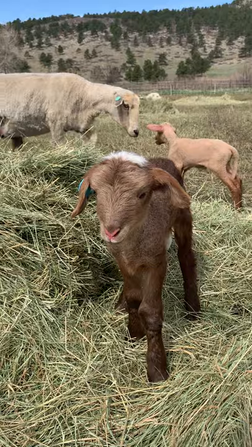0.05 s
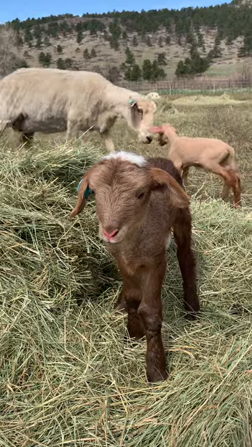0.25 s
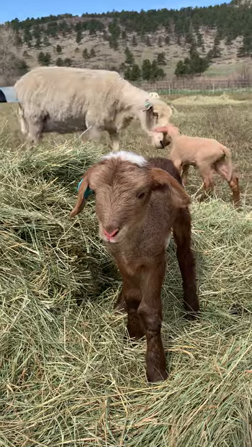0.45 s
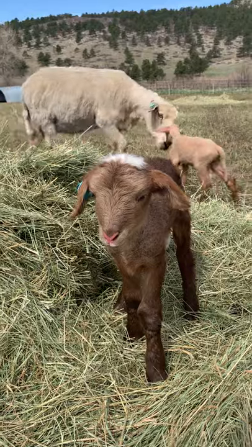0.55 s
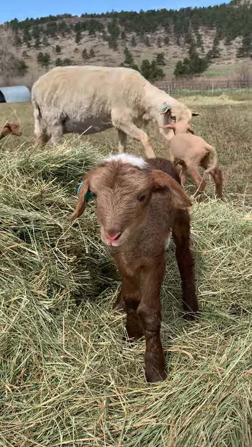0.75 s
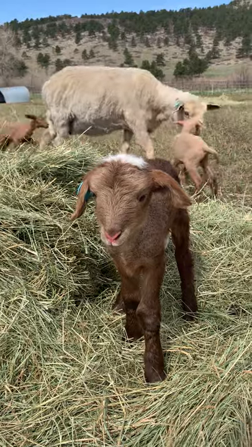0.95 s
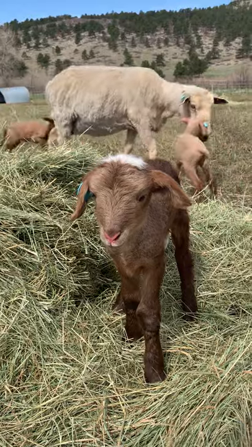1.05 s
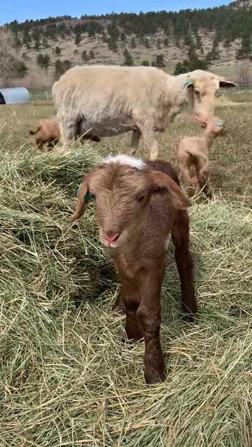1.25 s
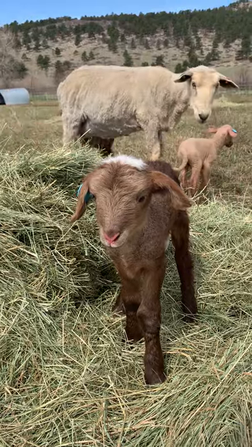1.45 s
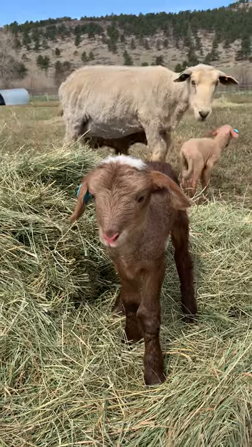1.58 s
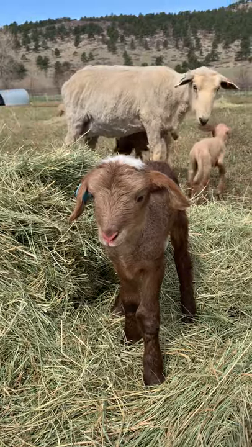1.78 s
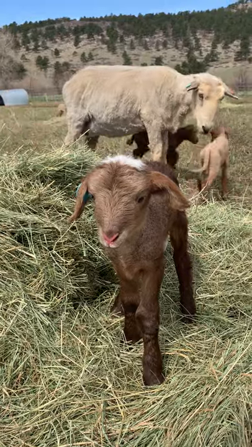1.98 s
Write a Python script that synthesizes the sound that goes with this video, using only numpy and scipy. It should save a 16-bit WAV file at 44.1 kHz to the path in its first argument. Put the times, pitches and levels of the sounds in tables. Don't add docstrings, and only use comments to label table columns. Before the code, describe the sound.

A lamb's high, stuttering bleat is already ending as it starts, fading within half a second; after a soft grunt, a ewe answers with a lower, buzzy bleat. Open pasture, low wind rumble, handheld stereo phone microphone.

```python
import sys
import numpy as np
from scipy import signal
from scipy.fft import rfft, irfft
from scipy.io import wavfile
from scipy.ndimage import uniform_filter1d

SR = 44100
rng = np.random.default_rng(int(sys.argv[2]) if len(sys.argv) > 2 else 0)


def gain_from_db(level_db):
    decades = np.asarray(level_db, float) / 20
    return 10 ** decades


def generate_wav(sig):
    pcm = np.round(np.clip(np.atleast_2d(sig).T, -1, 1) * 32767).astype(np.int16)
    wavfile.write(sys.argv[1], SR, pcm)


N = 89214
T = np.arange(N) / SR
HZ = np.fft.rfftfreq(N, 1 / SR)

# frequency_hz, density_db
AIR_SPECTRUM = [(300, 7), (600, 0.5), (1300, -1), (2200, -4.5), (3300, -22), (4500, -31), (7000, -31)]
# time_s, level_db
AIR_SWELL = [(0, -58.5), (.6, -62.5), (.9, -59.5), (1.4, -64), (1.75, -64)]
# frequency_hz, likeness_share
AIR_COHERENCE = [(350, 0.92), (600, 0.22), (1300, 0.56), (2200, 0.13), (5000, 0.18)]
# frequency_hz, phase_rad
AIR_PHASE = [(400, -10.5), (650, 0.4), (1800, -1.18), (2900, 0.5), (5000, -4.5)]
# frequency_hz, density_db
GRASS_SPECTRUM = [(3000, -1), (5500, -0.5), (7000, -6.5), (9500, 1.5), (12000, -6.5), (14000, -4),
                  (15500, -8)]
# time_s, level_db
GRASS_BREEZE = [(0, -76), (.36, -69), (.42, -73.5), (.5, -70), (.9, -74), (1.35, -78.5), (1.5, -71.5),
                (1.58, -73), (1.65, -79.5), (1.9, -79), (1.95, -71), (2.02, -75)]
# frequency_hz, likeness_share
GRASS_COHERENCE = [(4000, .6), (6000, .985), (15000, .99)]
# frequency_hz, density_db
WIND_SPECTRUM = [(12, -60), (20, -47), (43, -1.5), (75, 3), (117, -9), (155, 2.5), (184, -20.5),
                 (272, -19.5), (420, -28), (550, -98), (920, -120)]
# time_s, level_db
WIND_GUSTS = [(0.0, -39.5), (0.08, -40), (0.75, -38), (0.82, -34), (0.94, -41.5), (0.97, -35), (1.06, -42),
              (1.82, -39.5), (2.02, -48)]
# frequency_hz, width_hz, level_db
ENGINE_LINES = [(80.5, 7.7, -46), (153.6, 3.55, -44.5), (203.9, 40.6, -53), (271.3, 37, -62),
                (308.6, 4, -58.5)]
# time_s, level_db
ENGINE_DRIFT = [(0.0, -43), (0.17, -36.5), (0.22, -45.5), (0.46, -38.5), (0.76, -47), (0.96, -37),
                (1.33, -45.5), (1.6, -39.5), (1.85, -44), (1.91, -58), (1.94, -43.5), (2.02, -43.5)]

# centre_s, half_length_s, level_db, pitch_hz
LAMB_SYLLABLES = [
    (-.002, 0.02, -38, 343.4),
    (.068, 0.0108, -52.5, 330.5),
    (0.099, 0.0118, -58, 344.8),
    (0.129, 0.022, -42, 339.9),
    (0.202, .015, -46, 345.8),
    (0.266, 0.018, -44.5, 357.4),
    (0.339, 0.017, -46.5, 348.3),
    (0.422, 0.015, -51.5, 330.5),
    (0.45, 0.014, -65.5, 338.7),
]
LAMB_ROUGHNESS = [.35, .35, .5, .03, .14, .09, .14, .65, .75]
LAMB_DROOP = np.array([0.026, .03, 0.027, 0.009, .06, 0.055, .07, 0.027, 0.032])[:, None]
# time_s, level_db
LAMB_RASP = [(.05, -73.5), (.08, -59), (.17, -57.5), (.3, -55.5), (.365, -61.5), (.39, -67.5), (.47, -86)]
# frequency_hz, width_hz, level_db
LAMB_THROAT = [(1293, 200, -10), (1752, 165, -6.5), (2200, 310, -10), (3481, 255, 0), (4244, 310, -19),
               (4986, 226, -9), (5720, 150, -7.5), (6370, 310, -12)]
# frequency_hz, width_hz, level_db
LAMB_BREATH = [(8500, 1240, -23), (9670, 1900, -34)]
# frequency_hz, phase_rad
LAMB_PHASE = [(400, 0), (1300, -1.6), (2850, -3.14), (3600, -3.6), (4200, -6.2), (5000, -5)]
# frequency_hz, level_db
LAMB_SIDE = [(600, 9), (1300, 2), (1750, 23.5), (2300, -4), (3000, 2), (6000, 0)]

# time_s, level_db, pitch_hz
MOANS = [
    [(.12, -68, 315), (.145, -54, 316), (.175, -51, 310), (.197, -45, 262), (.21, -51, 240),
     (.225, -82, 229)],
    [(.16, -77, 445), (.18, -59, 437), (.2, -51.5, 387), (.222, -48, 290), (.24, -54.5, 275),
     (.27, -61, 271)],
]
# time_s, level_db, pitch_hz
GRUNT = [
    (.62, -71.5, 139.6),
    (.7, -56, 148.6),
    (.76, -61, 150.4),
    (.82, -61, 147),
    (.86, -59.5, 150.5),
    (.9, -74, 157),
]
# time_s, effort_db, pitch_hz, brightness_db
EWE_CALL = [
    (.865, -52, 145.9, -15),
    (.895, -49, 152.1, -16.5),
    (.94, -44, 157.1, -4),
    (1.008, -40, 168.1, -6),
    (1.1, -40.5, 161.1, -3),
    (1.205, -42.5, 160.8, -5.5),
    (1.24, -43.5, 139.9, -7.5),
    (1.285, -52.5, 132, -12),
    (1.34, -70, 128, -7),
]
# time_s, pitch_sag_share
EWE_CATCHES = [(.965, .035), (1.033, .06), (1.072, .06), (1.131, .05), (1.17, .07), (1.222, .03)]
# frequency_hz, width_hz, level_db
EWE_LOW = [(338, 150, -8), (564, 125, -1.5), (1068, 130, -9), (1540, 77, -2.5), (2030, 297, -5)]
# frequency_hz, width_hz, level_db
EWE_SHUT = [(473, 74, -2), (600, 86, -7), (1106, 160, -8.5), (1540, 43, -5.5), (2030, 173, -0.5)]
# frequency_hz, width_hz, level_db
EWE_HIGH = [(2960, 170, -19.5), (4310, 555, -13.5), (5680, 820, -17.5), (7220, 320, -1.5),
            (8160, 110, -5.5), (8190, 1610, -14.5), (10510, 280, -13), (13700, 4200, -32)]
# frequency_hz, phase_rad
EWE_PHASE = [(400, -0.34), (800, -1.08), (2300, -3.0), (3600, -1.5), (5000, -5)]
# frequency_hz, level_db
EWE_SIDE = [(500, -1), (1000, 2), (1800, 2), (2300, -4.5), (2900, 18), (4400, 1), (8000, 2.5)]
# time_s, level_db, frequency_hz, length_s
STRAW_TICKS = [
    (1.582, -76, 4500, .0004),
    (1.611, -77, 4400, .001),
    (1.639, -65, 4600, .0004),
    (1.797, -56, 11000, .00005),
    (1.849, -54, 11000, .00005),
    (1.881, -49, 12000, .00005),
    (1.916, -67, 4600, .0011),
]


def evened(x):
    return x / np.sqrt(np.mean(x ** 2) + 1e-20)


def read(points, hz):
    f, value = np.transpose(points)
    return np.interp(np.log(hz + 1), np.log(f + 1), value)


def curve(rows, order=1):
    return np.interp(T, np.array(rows)[:, 0], np.array(rows)[:, order])


def during(rows):
    return (T > rows[0][0]) * (T < rows[-1][0])


def sine(hz):
    return np.sin(2 * np.pi * np.cumsum(hz) / SR)


def port_turn(points, hz):
    lead_hz, port_gap_s = 6930, 1 / 4620
    f, rad = np.transpose([*points, (lead_hz, -np.pi)])
    lead = 2 * np.pi * port_gap_s * np.maximum(hz - lead_hz, 0)
    return np.exp(1j * (np.interp(hz, f, rad) + lead))


def throat(x, peaks):
    shape = 0
    for k, (hz, width, db) in enumerate(peaks):
        shape = shape + (-1) ** k * gain_from_db(db) / (1 + 1.3j * (HZ - hz) / width) ** 2
    return irfft(rfft(x) * shape, N)


def folds(hz, jitter):
    wander = evened(uniform_filter1d(rng.standard_normal(N), size=160))
    turns = np.cumsum(hz * (1 + jitter * wander)) / SR
    harmonics = int(15000 / hz.max())
    pulses = sum(np.cos(2 * np.pi * k * turns) for k in range(1, harmonics))
    puffs = (.12 + np.exp(-(turns % 1) / .18)) * rng.standard_normal(N)
    return evened(pulses), evened(puffs)


def placed(x, phase, side):
    z, tilt = rfft(x), gain_from_db(read(side, HZ) / 2)
    scatter_db, decay_s = -13, .09
    t = T[:8000]
    tail = rng.standard_normal((2, 8000)) * gain_from_db(-60 * t / decay_s) * (t > .002)
    band = (HZ > 420) / (1 + (HZ / 3000) ** 2)
    scatter = irfft(z * rfft(tail / np.linalg.norm(tail[0]), N) * band, N)
    direct = irfft([z * tilt, z / tilt * port_turn(phase, HZ)], N)
    return direct + gain_from_db(scatter_db) * scatter


def diffuse_hiss(colour, likeness, patchy_db, flicker_db):
    frames, hz = N // 128 + 5, np.fft.rfftfreq(512, 1 / SR)
    a, b, c, d, patches = rng.standard_normal((frames, 257, 5)).T
    flicker = evened(uniform_filter1d(uniform_filter1d(patches[0], size=9), size=9))
    patches = uniform_filter1d(uniform_filter1d(patches, size=12, axis=0), size=16, axis=1)
    patches = evened(patches)
    same = np.clip(read(likeness, hz), 0, 1)[:, None]
    left = a + 1j * b
    right = same * left + np.sqrt(1 - same ** 2) * (c + 1j * d)
    right = right * port_turn(AIR_PHASE, hz)[:, None]
    level = gain_from_db(read(colour, hz)[:, None] + patchy_db * patches + flicker_db * flicker)
    z = np.array([left, right]) * level * (hz > 300)[:, None]
    return evened(signal.istft(z, nperseg=512, noverlap=384)[1][:, :N])


def open_air():
    return gain_from_db(curve(AIR_SWELL)) * diffuse_hiss(AIR_SPECTRUM, AIR_COHERENCE, patchy_db=1.0, flicker_db=2.3)


def dry_grass():
    hiss = diffuse_hiss(GRASS_SPECTRUM, GRASS_COHERENCE, patchy_db=1.5, flicker_db=2.1)
    return gain_from_db(curve(GRASS_BREEZE)) * hiss


def wind():
    z = rfft(rng.standard_normal(N))
    shape = gain_from_db(read(WIND_SPECTRUM, HZ)) * (HZ > 15) / (1 + (HZ / 430) ** 8)
    return evened(irfft(z * shape, N)) * gain_from_db(curve(WIND_GUSTS) - 0.5)


def far_engine():
    z = rfft(rng.standard_normal(N))
    lines = 0
    for hz, width, db in ENGINE_LINES:
        lines = lines + gain_from_db(db) * evened(irfft(z / (1 + (2 * (HZ - hz) / width) ** 2), N))
    return lines * gain_from_db(curve(ENGINE_DRIFT) + 40.0)


def lamb():
    at, half, db, hz = (c[:, None] for c in np.transpose(LAMB_SYLLABLES))
    rough = np.reshape(LAMB_ROUGHNESS, (-1, 1))
    droop = np.reshape(LAMB_DROOP, (-1, 1))
    u = (T - at) / half
    bells = gain_from_db(db - 9 * u ** 4 / (1 + 0.045 * u ** 2)) + 1e-9
    share = bells ** 2 / (bells ** 2).sum(0)
    pitch = (share * hz * (1 - droop * np.minimum(u ** 2, 1.5))).sum(0)
    pulses, noise = folds(uniform_filter1d(pitch, size=200), jitter=.006)

    breath = throat(.25 * pulses + noise, LAMB_BREATH) * gain_from_db(2.5 - 18.5 * T)
    clean = evened(throat(pulses, LAMB_THROAT) + breath)
    puffs = evened(throat(noise, LAMB_THROAT) + breath)

    shifted = [(f * 0.983, width, level + 0.5 * max(f / 1000 - 3.5, 0)) for f, width, level in LAMB_THROAT]
    between = evened(throat(0.56 * pulses + 0.64 * noise, shifted) + breath)
    rasp = gain_from_db(curve(LAMB_RASP)) * (T < LAMB_RASP[-1][0])

    voice = (bells * np.sqrt(1 - rough)).sum(0) * clean
    voice = voice + (bells * np.sqrt(rough)).sum(0) * puffs + 1.83 * rasp * between
    return placed(voice, LAMB_PHASE, LAMB_SIDE) * (T < .8)


def moans():
    return sum(gain_from_db(curve(m)) * during(m) * np.sqrt(2) * sine(curve(m, order=2)) for m in MOANS)


def hoof_thump():
    start_s, width_s, level_db, pitch_hz = .2225, .0024, -47, 1500
    u = np.maximum(T - start_s, 0) / width_s
    envelope = np.minimum(u * 2, 1) * np.exp(-u / 7)
    return gain_from_db(level_db) * envelope * sine(pitch_hz * (.22 + .78 * np.exp(-u)))


def grunt():
    clean, puffs = folds(curve(GRUNT, order=2), jitter=.06)
    low = evened(throat(.25 * clean + .75 * puffs, EWE_LOW[:3]))
    return placed(low * gain_from_db(curve(GRUNT)) * during(GRUNT), EWE_PHASE, EWE_SIDE)


def ewe():
    catch_s, catch_db, rough, high_rough = .011, -32, .25, .36
    opens_s, opening_s = 0.97, .015
    sag = sum(share * np.exp(-((T - s) / catch_s) ** 2) for s, share in EWE_CATCHES)
    clean, puffs = folds(curve(EWE_CALL, order=2) * (1 - sag), jitter=.006)
    drive = ((1 - rough) * clean + rough * puffs) * gain_from_db(1.2 * catch_db * sag)
    opened = .5 + .5 * np.tanh((T - opens_s) / opening_s)
    low = opened * throat(drive, EWE_LOW) + (1 - opened) * throat(drive + 0.56 * puffs, EWE_SHUT)
    high = throat((1 - high_rough) * clean + high_rough * puffs, EWE_HIGH)
    high = high * gain_from_db(curve(EWE_CALL, order=3) + catch_db * sag)
    voice = (low + high) / low.std() * gain_from_db(curve(EWE_CALL)) * during(EWE_CALL)
    return placed(voice, EWE_PHASE, EWE_SIDE)


def straw_ticks():
    ticks = 0
    for s, db, hz, length in STRAW_TICKS:
        ticks = ticks + gain_from_db(db) * np.exp(-((T - s) / length) ** 2) * np.cos(2 * np.pi * hz * (T - s))
    z = rfft(ticks)
    return irfft([z, z * port_turn([(4600, -2 * np.pi)], HZ)], N)


def scene():
    hiss = open_air() + dry_grass()
    animals = lamb() + ewe() + grunt() + moans()
    rumble = wind() + far_engine()
    return hiss + animals + rumble + hoof_thump() + straw_ticks()


def band_limit(x):
    return signal.sosfilt(signal.butter(12, 15770, fs=SR, output="sos"), x)


def record(dry):
    mono_hz = 427
    mid = dry.mean(0)
    high_pass = 1 / np.sqrt(1 + (mono_hz / (HZ + 1)) ** 16)
    side = irfft(rfft(dry[0] - dry[1]) / 2 * high_pass, N)
    return band_limit(np.array([mid + side, mid - side]))


dry = scene()
out = record(dry)
generate_wav(out)
```